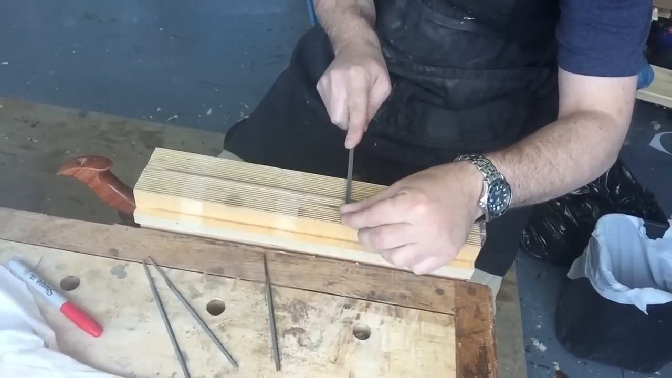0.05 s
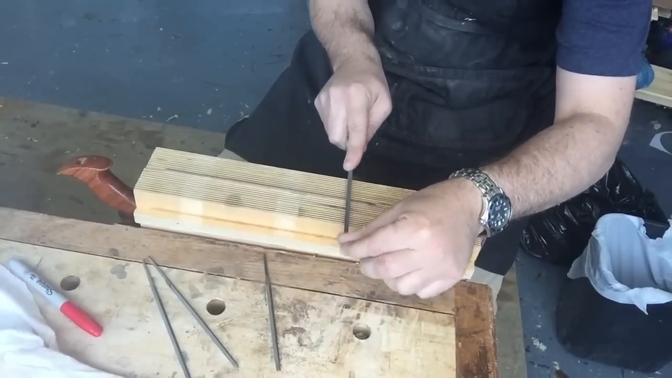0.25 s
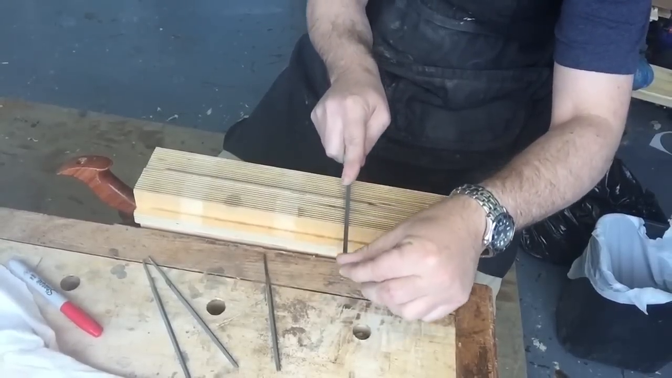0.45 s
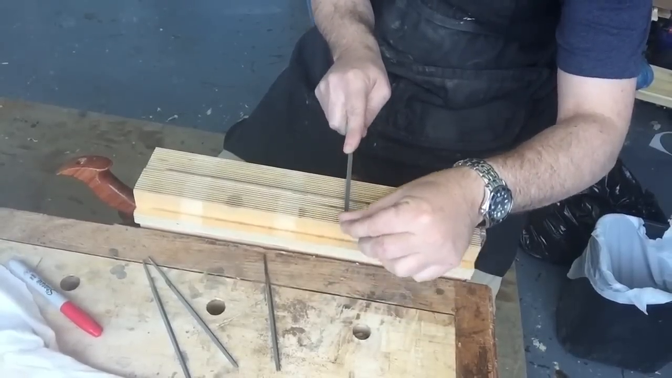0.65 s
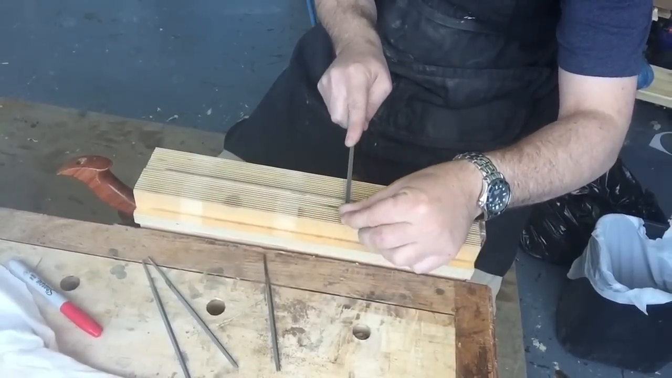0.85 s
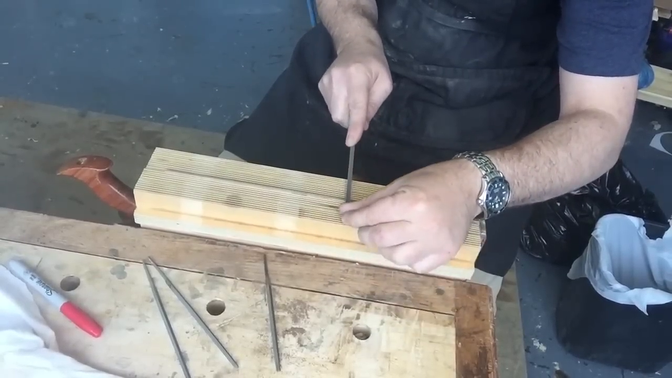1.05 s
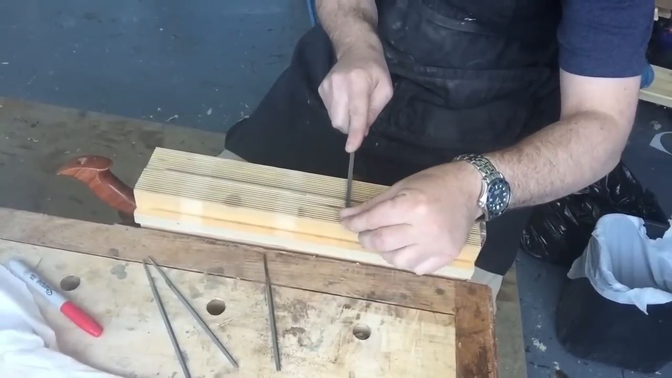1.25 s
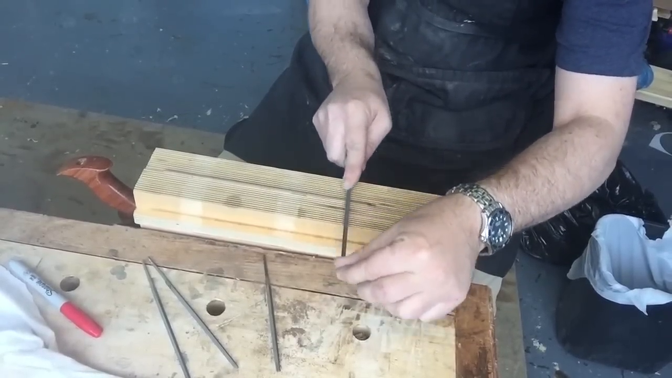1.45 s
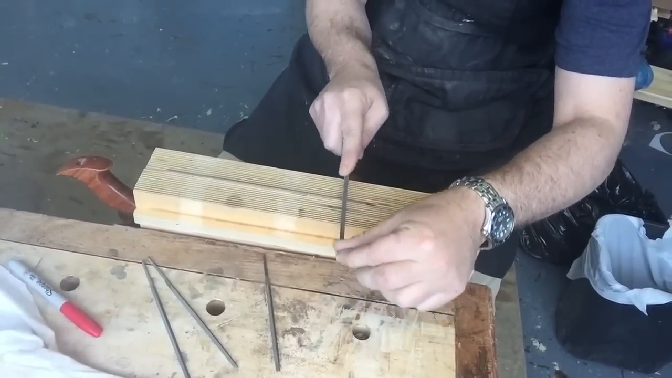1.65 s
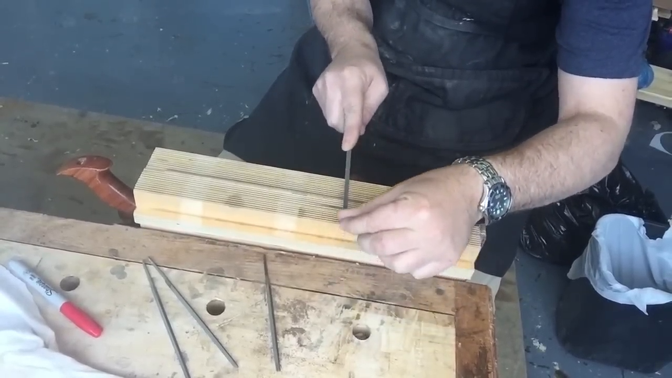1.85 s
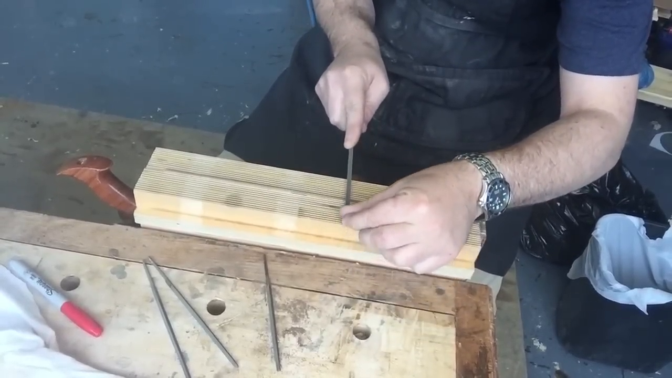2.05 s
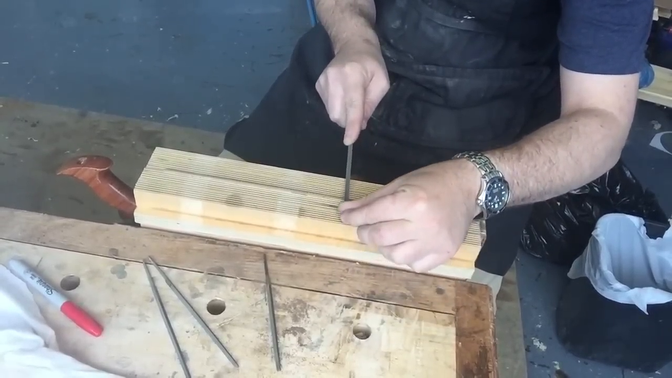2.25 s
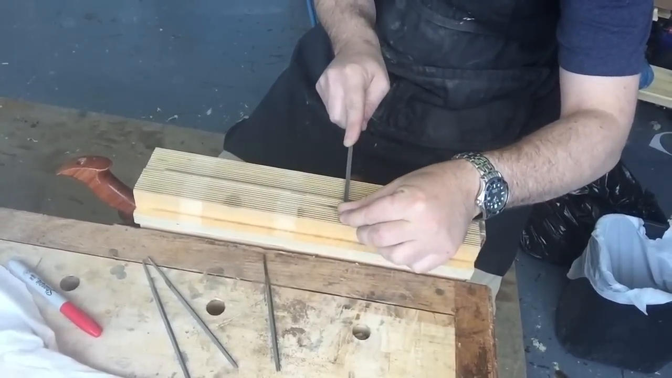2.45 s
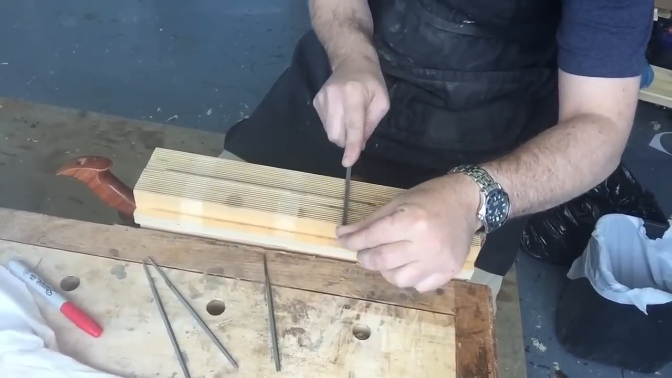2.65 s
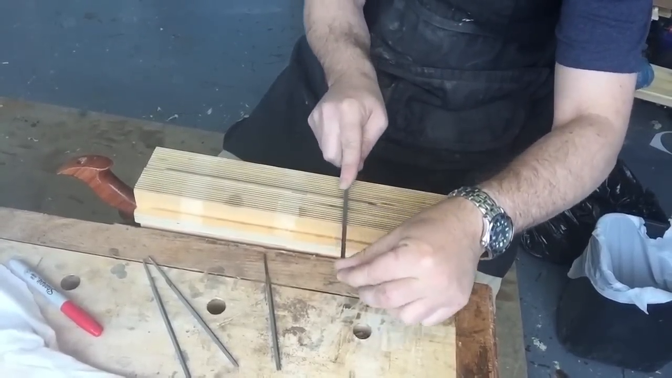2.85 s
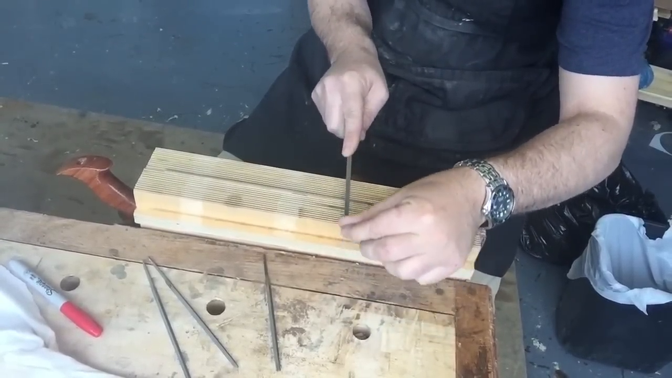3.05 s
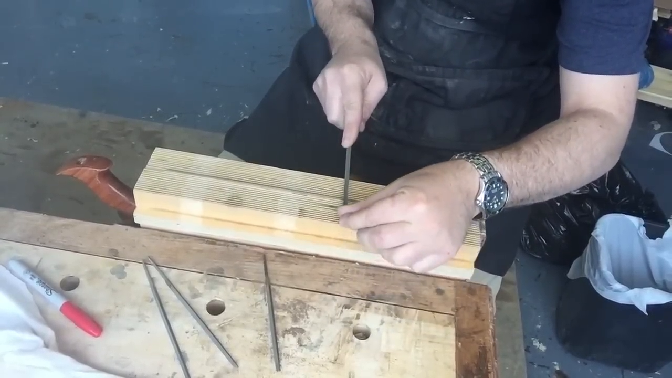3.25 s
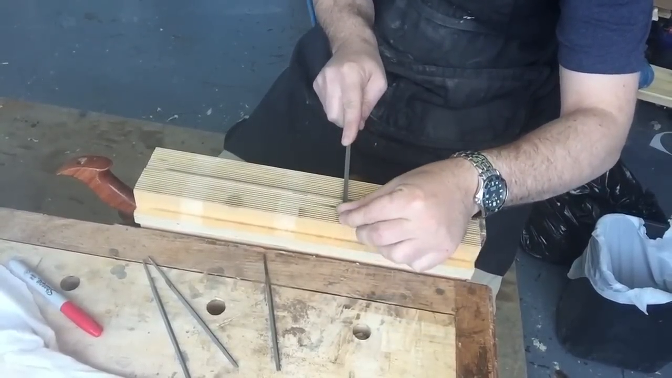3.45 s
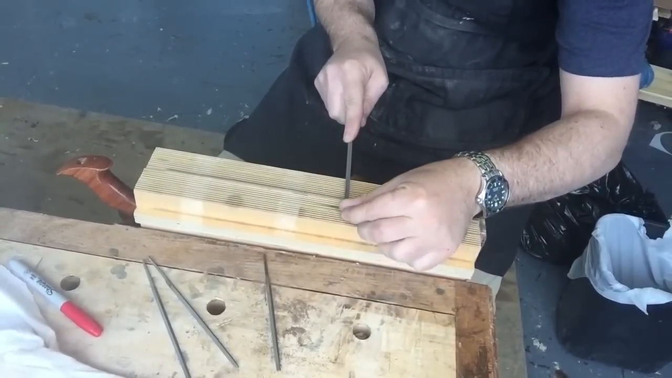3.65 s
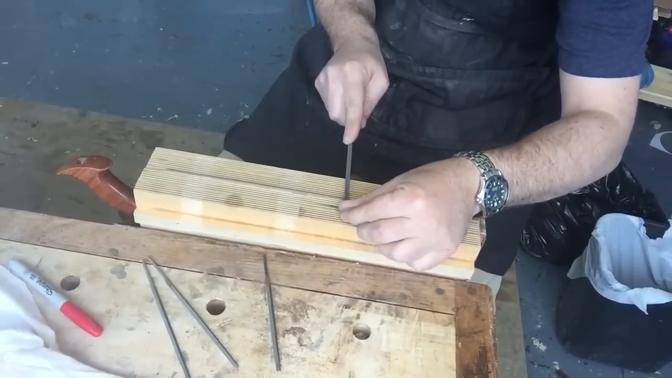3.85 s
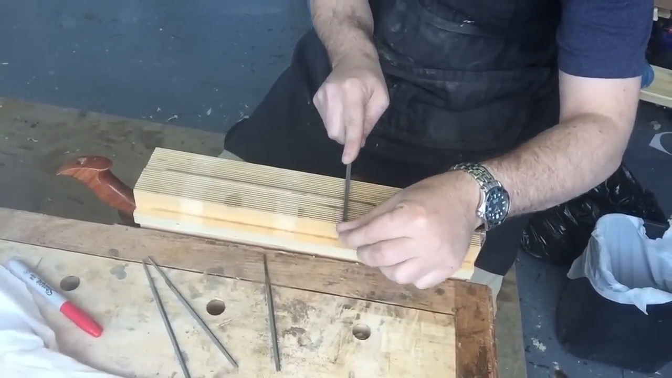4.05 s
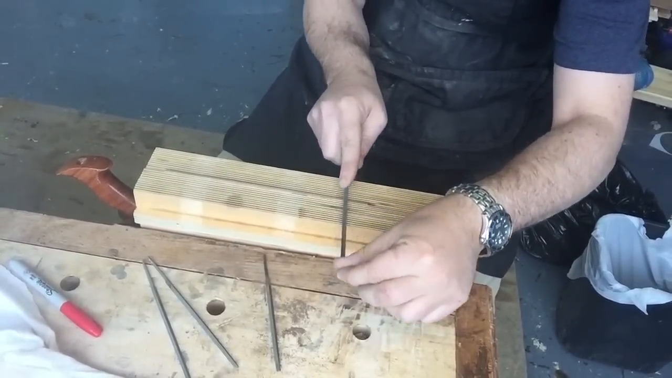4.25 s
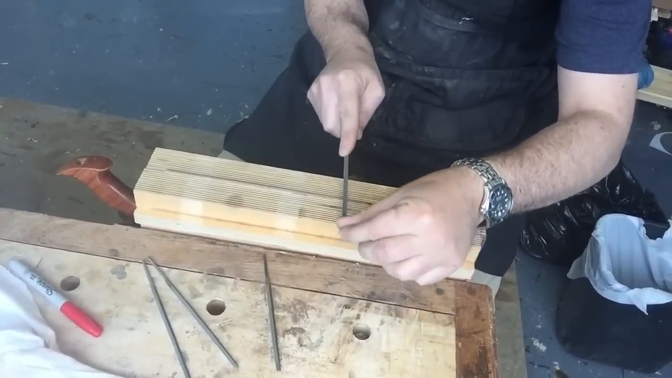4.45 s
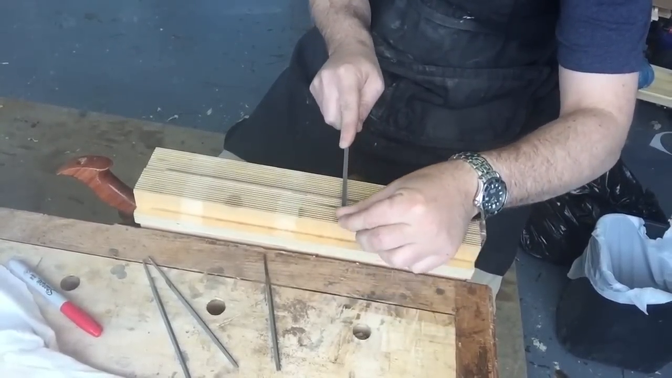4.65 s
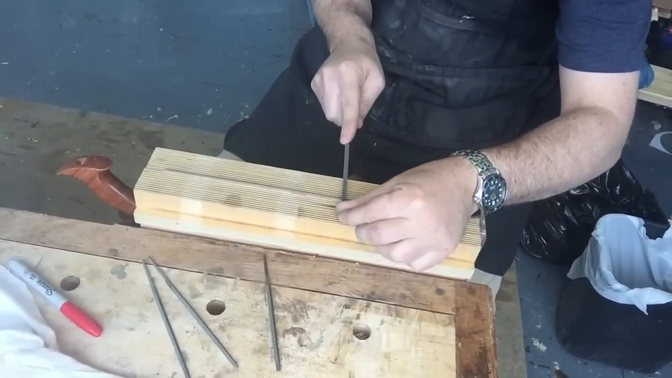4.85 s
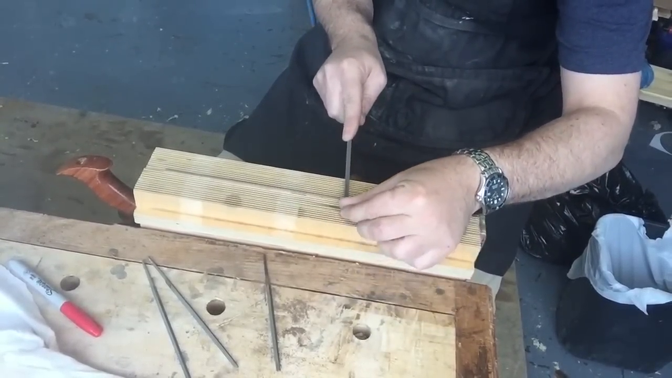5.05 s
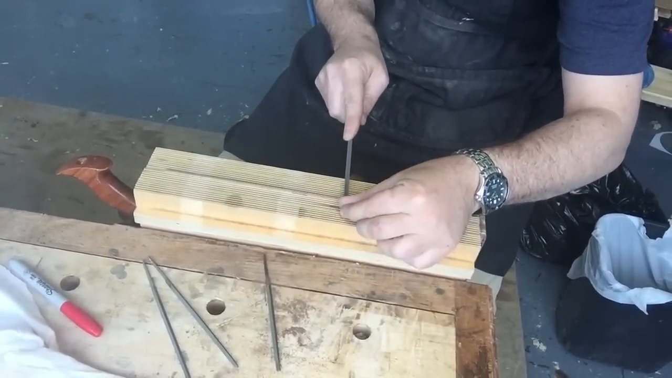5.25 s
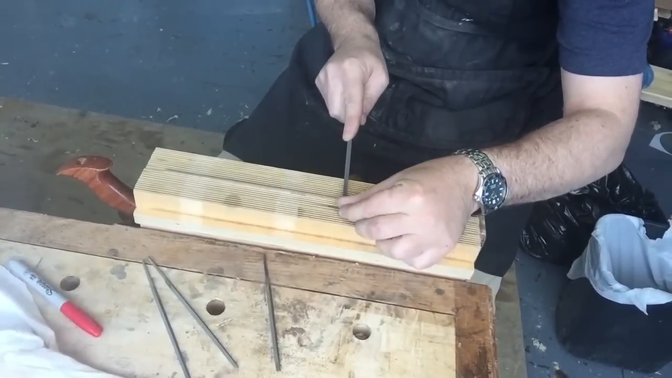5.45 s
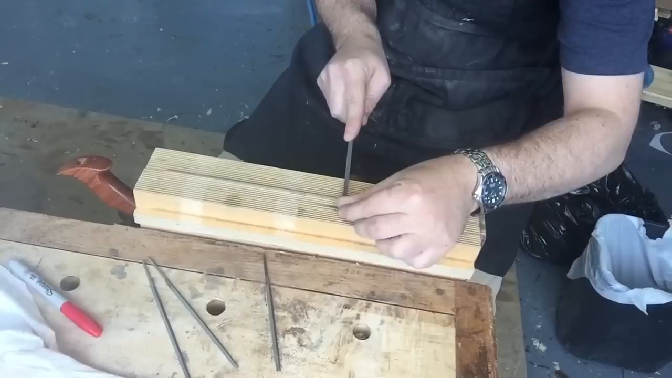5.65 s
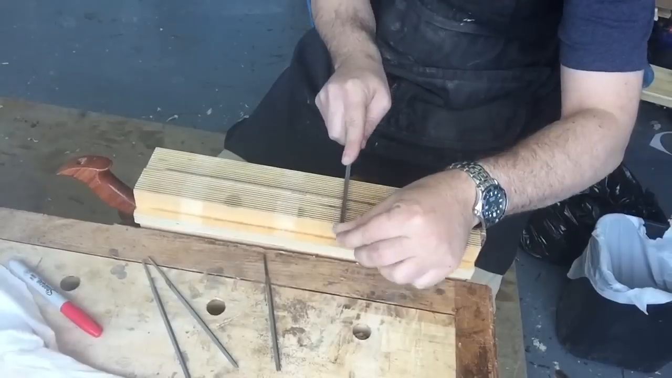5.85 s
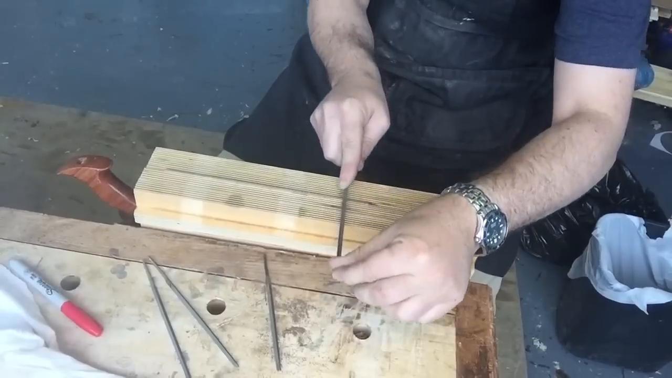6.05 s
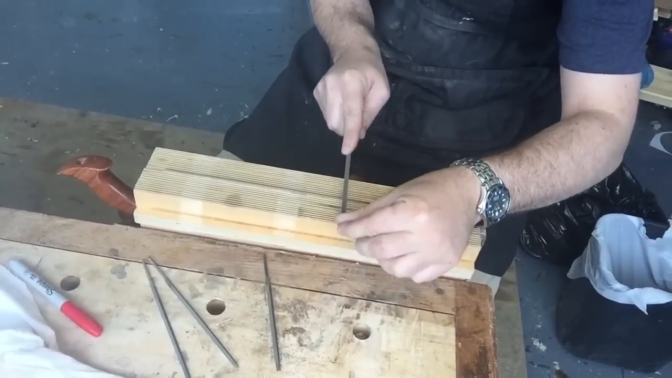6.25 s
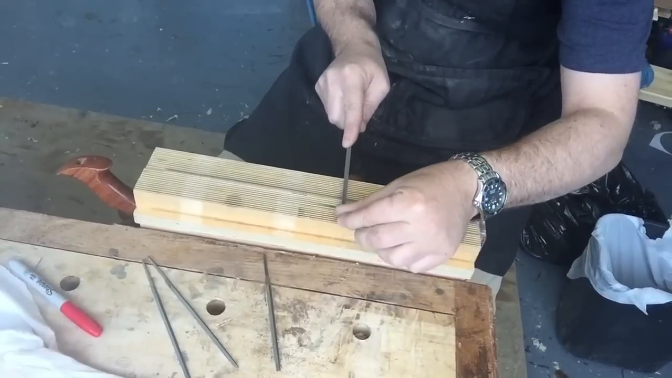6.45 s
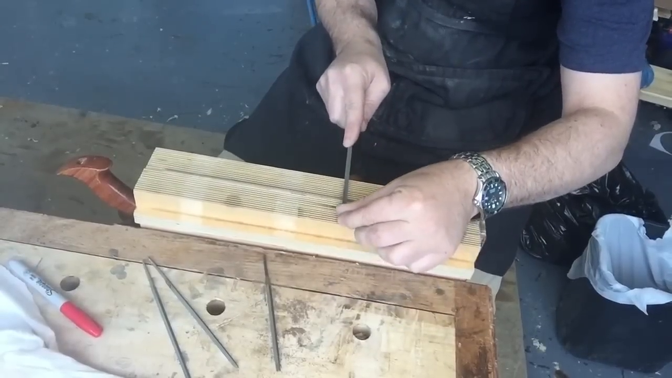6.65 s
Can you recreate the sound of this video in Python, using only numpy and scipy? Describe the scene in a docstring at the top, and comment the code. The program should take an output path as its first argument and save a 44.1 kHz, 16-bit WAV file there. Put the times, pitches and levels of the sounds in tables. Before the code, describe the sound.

Short gritty file strokes on saw steel, about one every second or so, the last after a longer pause. Each starts with a small click of landing, roars briefly around the midrange with hissing metal grit on top, then stops into a short room echo. Very soft scrapes and ticks mark the file being repositioned. Near microphone, single channel, quiet indoor air with a low wavering hum.

```python
"""A triangular file sharpens a hand saw clamped between two wooden battens, in a small workshop.
Five pushes rasp across a saw tooth: pulses, one per cut of the file, excite the modes of blade and clamp,
while chips, as noise bursts, make the steel sizzle and two gliding modes of the file squeak.
Light slides into the next gullet, landings, snags and dry ticks come between and around the pushes.
The room's decaying echo, still air, a low rumble with soft bumps and a wavering hum lie around them."""
import sys
import numpy as np
from scipy import signal
from scipy.fft import rfft, irfft, next_fast_len
from scipy.io import wavfile
from scipy.ndimage import map_coordinates

SR = 44100
rng = np.random.default_rng(int(sys.argv[2]) if len(sys.argv) > 2 else 0)


def waveform_to_disk(signal):
    """Save audio, clipped to [-1, 1], as 16-bit WAV at the path in sys.argv[1]."""
    frames = np.transpose(np.atleast_2d(signal))
    scaled = np.clip(frames, -1, 1) * 32767
    samples = np.round(scaled).astype(np.int16)
    wavfile.write(sys.argv[1], SR, samples)


N = 295911  # length in samples


def amp(db):
    """Decibel law: the amplitude factor of a level in dB."""
    return 10 ** (np.asarray(db) / 20)


def unit(x):
    """Power normalisation: x scaled to a mean square of 1."""
    return x / np.sqrt(np.mean(x ** 2) + 1e-20)


def along(points, hz):
    """Logarithmic frequency scale: (Hz, value) points interpolated in log frequency."""
    f, v = np.transpose(points)
    return np.interp(np.log(hz + 1), np.log(f), v)


def colour(points):
    """Spectral envelope: gain over frequency from (Hz, dB) points."""
    return lambda hz: amp(along(points, hz))


def resonances(modes):
    """Modal superposition: the powers of a body's modes add to its gain over frequency."""
    def gain(hz):
        power = 0
        for centre, half_width, db in modes:
            peak = amp(db) / (1 + ((hz - centre) / half_width) ** 2)
            power = power + peak ** 2
        return np.sqrt(power)
    return gain


def ring(x, gain, size=32768):
    """Minimum-phase response: x through the causal filter of unit energy with this gain over frequency."""
    magnitude = unit(gain(np.fft.rfftfreq(size, 1 / SR)))
    cepstrum = irfft(np.log(np.maximum(magnitude, 1e-6)))
    # folding the cepstrum onto positive times makes the filter causal
    cepstrum[1:size // 2] *= 2
    cepstrum[size // 2 + 1:] = 0
    response = irfft(np.exp(rfft(cepstrum)))[:size // 2]
    return signal.oaconvolve(x, response)[:N]


def wobble(rate):
    """Slow random fluctuation: a smooth curve through normal random values, rate knots a second."""
    knots = rng.standard_normal(N // 20)
    return map_coordinates(knots, [np.arange(N) * rate / SR], mode="wrap")


def stroke(start, stop, crest=.5):
    """Stroke kinematics: progress (0-1) and speed (0-1), an arch topping at the share crest of the time."""
    progress = np.clip((np.arange(N) / SR - start) / (stop - start), 0, 1)
    skew = np.log(.5) / np.log(np.clip(crest, .1, .9))
    return progress, np.abs(np.sin(np.pi * progress ** skew))


# each level grows as this power of the hand's speed
BITE_POWER, KNOCK_POWER, SIZZLE_POWER = 1.7, .65, 1.5
KNOCK_FADE_DB = 4  # the clamp is shaken this much less at the end of a push than at its start
LANDING_S = .006  # the file takes this long to seat
# a slow file skates dully instead of biting: level relative to the bite, power of the speed
SKATE_DB, SKATE_POWER = -13, 0.83
# cuts a second: nearly still, and what a push or a slide adds at its top speed
CREEP_HZ, PUSH_HZ, SLIDE_HZ = 130.23, 1152.6, 329.7
# a slide's level as a power of its speed; its sizzle relative to the blade
SLIDE_POWER, SLIDE_SIZZLE_DB = .5, -16

# Pushes of the file; crest is the share of the stroke at which speed tops, knock and sizzle are relative
# to the bite, and band is what this tooth drives hardest:
# start_s, lands_s, stop_s, crest, bite_db, knock_db, sizzle_db, band_hz, boost_db
FILE_PUSHES = [(.145, 0.212, 0.51, .6, -25.5, -7.5, -1.5, 760, 4),
               (1.291, 1.296, 1.665, .49, -25.5, -7.5, -5.5, 835, 5),
               (2.585, 2.593, 2.952, 0.54, -26.5, -6.5, -5.5, 830, 3.5),
               (3.987, 4.021, 4.348, .57, -26.8, -5, -6, 1220, 0.5),
               (5.765, 5.801, 6.1395, .55, -25, -9.5, -3.5, 860, 3.5)]
# Light slides while the file finds its place: start_s, length_s, blade_db, clamp_db
FILE_SLIDES = [(0, 0.083, -69.5, -61), (1.135, .05, -63, -70.5), (2.086, .05, -63, -62),
               (2.576, .045, -59, -59.5), (3.468, .045, -68.5, -66.5), (3.565, .09, -64, -54),
               (3.977, .05, -57, -52), (4.786, .05, -54.5, -49), (4.862, .175, -55, -53),
               (5.038, .038, -57, -62), (5.433, .06, -69, -65.5), (5.563, .04, -69, -68)]


def motion():
    """Sliding friction: the hand's speed sets the forces, the sizzle and the rate of cuts crossing the tooth."""
    t = np.arange(N) / SR
    bite, touch, knock, sizzle = np.zeros((4, N))
    rate = np.full(N, float(CREEP_HZ))
    for start, lands, stop, crest, bite_db, knock_db, sizzle_db, *_ in FILE_PUSHES:
        progress, speed = stroke(start, stop, crest)
        press = amp(bite_db) * np.clip((t - lands) / LANDING_S, 0, 1)
        bite += press * speed ** BITE_POWER
        touch += press * speed ** SKATE_POWER * amp(SKATE_DB)
        knock += press * speed ** KNOCK_POWER * amp(knock_db - KNOCK_FADE_DB * (progress - .5))
        sizzle += press * speed ** SIZZLE_POWER * amp(sizzle_db)
        rate += PUSH_HZ * speed
    for start, length, blade_db, clamp_db in FILE_SLIDES:
        _, speed = stroke(start, start + length)
        rub = speed ** SLIDE_POWER
        touch += rub * amp(blade_db)
        knock += rub * amp(clamp_db)
        sizzle += rub * amp(blade_db + SLIDE_SIZZLE_DB)
        rate += SLIDE_HZ * speed
    return bite, touch, knock, sizzle, rate


def cuts(rate, jitter, scatter_db):
    """Impulsive excitation: one pulse of uneven timing and size for each cut of the file; mean power 1."""
    count = np.cumsum(rate) / SR
    chance = rng.standard_normal((N // 20, 2))[:int(count[-1])]
    turn = np.arange(len(chance)) + jitter * chance[:, 0]
    at = np.minimum(np.searchsorted(count, turn), N - 1)
    size = unit(amp(scatter_db * np.clip(chance[:, 1], -2, 2)))
    # sparser pulses are larger, so that the rate leaves the power unchanged
    return np.bincount(at, size * np.sqrt(SR / rate[at]), N)


def crumble(pulses, life):
    """Fracture noise: each pulse tears off a chip, a burst with its energy and a power decay of life s."""
    keep = np.exp(-1 / (life * SR))
    power = signal.lfilter([1 - keep], [1, -keep], pulses ** 2)
    return np.sqrt(np.abs(power)) * rng.standard_normal(N)


def favour(force, sharpness=4):
    """Selective excitation: each push works another tooth, which lifts its own band of the blade's modes."""
    out = force.copy()
    for _, lands, stop, *_, hz, boost_db in FILE_PUSHES:
        span = slice(int(lands * SR), int(stop * SR))
        band = signal.lfilter(*signal.iirpeak(hz, sharpness, SR), force[span])
        out[span] += (amp(boost_db) - 1) * band
    return out


# Modes of the saw blade: centre_hz, half_width_hz, level_db
BLADE_MODES = [(789, 99, -8.5), (868, 6.8, -8.5), (913.7, 38, -1.5), (969.4, 16, -2), (1056.4, 34.3, 0),
               (1154, 24, -3.5), (1183, 21, -5), (1241, 50, -5), (1347, 42.8, -7.5), (1508, 139.8, -8.5),
               (1902, 137, -7.5), (2089, 31.4, -11), (2340, 180, -10), (2595, 81, -13), (2910, 129, -5),
               (2946, 270, -20.5), (3748, 104, -17.5), (4155, 260, -22), (4680, 268.5, -22.5),
               (5560, 510, -23), (6080, 290, -23.5), (6980, 740, -21), (8980, 440, -24.5), (9680, 226, -22),
               (10130, 160, -23), (11450, 580, -23.5)]
# Modes of the wooden clamp: centre_hz, half_width_hz, level_db
CLAMP_MODES = [(160, 22, -10), (210, 18, -12), (258.9, 13, 1), (300.4, 14.45, -9), (336.8, 33, -10),
               (448.4, 19, -5.5), (440.8, 28, -2.5), (562.5, 27, -9.5), (643.6, 35, -17)]
# High ring of the steel, relative levels: frequency_hz, level_db
STEEL_RING = [(7000, -54), (9500, -14), (10600, -29), (12000, -22), (12600, -2.5), (13000, -2),
              (13500, 1.5), (14300, -3.5), (15300, -12.5)]
# How a light touch dulls the rasp, relative levels: frequency_hz, level_db
LIGHT_TOUCH = [(700, 7), (1300, 1.5), (2300, 1.5), (2950, -6), (4500, 0), (7000, -11.5), (11000, -9)]


def rasp(bite, touch, knock, sizzle, rate):
    """Forced vibration: cuts knock the saw and tear chips; the grip tightens and slackens unevenly."""
    teeth = cuts(rate, jitter=.14, scatter_db=3.5)
    grip = wobble(130)
    force = amp(-4.0) * teeth + amp(-2.0) * crumble(teeth, life=0.0014)
    force = force * unit(amp(1.24 * grip))
    pressed = favour(force * bite)
    skating = ring(force * touch, colour(LIGHT_TOUCH))
    blade = ring(pressed + skating, resonances(BLADE_MODES))
    clamp = ring(force * knock, resonances(CLAMP_MODES))
    chips = crumble(teeth * unit(amp(2.255 * wobble(700))), life=0.00039)
    steel = ring(chips * sizzle * unit(amp(2.4 * grip)), colour(STEEL_RING))
    return amp(-2.06) * blade + amp(1.26) * clamp + steel


BUMP_S = 0.027  # a bump swells from 1/e of its peak, and fades back to it, in this time
# Spectrum of the still air, relative levels: frequency_hz, level_db
AIR_SPECTRUM = [(15, -43), (28, -29.5), (60, -6), (120, -7.5), (170, -6.5), (245, -3), (290, -10),
                (450, -17.5), (950, -18), (2230, -30), (5880, -35), (15500, -44)]
# Soft low bumps around the bench: centre_s, level_db
BENCH_BUMPS = [(2.093, -60), (3.06, -58.5), (3.37, -55.5), (3.631, -56), (4.9, -56), (5.53, -56),
               (5.78, -52), (6.258, -56)]


def background():
    """Filtered noise and phase modulation: still air, restless low rumble, soft bumps and a wavering hum."""
    t = np.arange(N) / SR
    air = amp(-62.5 + 0.86 * wobble(8.4)) * ring(rng.standard_normal(N), colour(AIR_SPECTRUM))
    swell = amp(-64.5 + 2.38 * wobble(15))
    for s, db in BENCH_BUMPS:
        swell = swell + amp(db) * np.exp(-((t - s) / BUMP_S) ** 2)
    low = colour([(30, -29.5), (62, 7), (95, -0.5), (180, -5.0), (400, -33.5), (1500, -85.0)])
    rumble = swell * ring(rng.standard_normal(N), low)
    hum = amp(-69 + 5.59 * wobble(5.8)) * np.sin(2 * np.pi * 215 * t + 2.7 * wobble(14))
    return air + rumble + hum


# Reverberation of the room, time to decay by 60 dB: frequency_hz, decay_s
ROOM_DECAY = [(200, 0.47), (500, 0.42), (1000, 0.41), (2000, 0.4), (2900, 0.39), (4200, .41), (8000, 0.27),
              (14000, .24)]
# Strength of the room's answer, relative levels: frequency_hz, level_db
ROOM_ANSWER = [(200, -0.5), (500, -3.5), (1050, -3.5), (2200, -4), (2900, -3), (3300, 2), (4200, 3),
               (9000, -3.5), (13500, -8.5)]


def workshop(x, delay=.005, count=24, boom_hz=211, boom_sharpness=70, boom_db=11):
    """Reverberation: count noise tails in turn, each a new random draw; treble dies first, a low mode last."""
    noise = rng.standard_normal((count, SR * 2 // 3))
    hz, t, z = signal.stft(noise, SR, nperseg=256)
    decay = amp(-60 * t / along(ROOM_DECAY, hz)[:, None])
    tails = signal.istft(z * decay, SR, nperseg=256)[1]
    wet = np.zeros(N + SR)
    # renewing the tail averages out the chance peaks of any one draw
    for part, tail in zip(np.array_split(np.arange(N), count), tails):
        answer = signal.fftconvolve(x[part], tail / np.linalg.norm(tail))
        wet[part[0] + int(delay * SR):][:len(answer)] += answer
    boom = signal.lfilter(*signal.iirpeak(boom_hz, boom_sharpness, SR), x)
    return ring(wet[:N], colour(ROOM_ANSWER)) + amp(boom_db) * boom


def blows(times, db):
    """Ideal impulses: single samples at these times (s) and levels (dB)."""
    return np.bincount(np.round(times * SR).astype(int), amp(db), N)


# The file lands on or snags a tooth, sizzle relative to the blow: start_s, blow_db, sizzle_db
TOOTH_CATCHES = [(0.205, -20, -4), (0.217, -10, -20), (1.162, -35.5, -6), (1.2, -29.5, -2), (1.303, -35, 6),
                 (1.36, -7.5, -1), (2.095, -34.5, -14.5), (2.62, -23.5, -9), (2.841, -8, -1),
                 (3.489, -45, -20.5), (3.997, -32, -8.5), (4.025, -19, -4.5), (4.085, -5, -5),
                 (4.799, -33.5, -15), (5.202, -39.5, -26.5), (5.469, -38, -29.5), (5.784, -24.5, -11),
                 (5.809, -14, -9.5)]
# Small dry ticks from handling: start_s, blow_db
HANDLING_TICKS = [(0.165, -40.5), (2.401, -20), (3.804, -26), (5.334, -35.5)]
# Spectrum of a tick, relative levels: frequency_hz, level_db
TICK_SPECTRUM = [(200, -13.5), (650, -9), (950, 7.5), (1300, 0), (1900, -6.5), (2450, 1.5), (3300, -19.5),
                 (4800, -13), (7500, -19.5), (9500, -48.5)]


def knocks():
    """Impulse response: landings and snags ring the saw; handling adds a few dry ticks."""
    s, db, sizzle_db = np.transpose(TOOTH_CATCHES)
    hits = blows(s, db)
    force = hits + amp(-1.5) * crumble(hits, life=.002)
    saw = ring(force, resonances(BLADE_MODES)) + amp(-2.5) * ring(force, resonances(CLAMP_MODES))
    steel = ring(crumble(blows(s, db + sizzle_db), life=.0008), colour(STEEL_RING))
    tick_bursts = crumble(blows(*np.transpose(HANDLING_TICKS)), life=0.0041)
    return saw + steel + ring(tick_bursts, colour(TICK_SPECTRUM))


# The file chatters; swell is the time to swell and to fade, pitch that at the centre:
# centre_s, swell_s, pitch_hz, level_db
FILE_SQUEAKS = [(0.328, .028, 12850, -14.5), (0.367, .018, 14500, -15), (.389, 0.026, 13370, -11.5),
                (.448, .024, 13700, -18.5), (1.43, .018, 13110, -18), (1.567, 0.033, 13870, -17.5),
                (2.804, 0.0081, 14000, -30), (2.872, 0.028, 13910, -20), (3.998, 0.0042, 10900, -42),
                (4.138, 0.033, 13500, -22.5), (4.22, 0.0099, 13900, -27.5), (5.863, 0.01, 13640, -26.5),
                (5.95, .022, 13200, -16), (6.01, .016, 13570, -11), (6.066, 0.015, 14120, -16.5)]


def squeaks(rate, glide_hz=-32000, limit=1.24, lower_ratio=0.63, lower_db=-24):
    """Friction-limited oscillation: cuts pump two file modes, falling in Hz a second as the contact moves."""
    t = np.arange(N) / SR
    life = .0007  # s, amplitude decay of one kick
    kicks = cuts(rate, jitter=.1, scatter_db=7.0) * np.exp(2j * np.pi * rng.random(N))
    swing = signal.lfilter([1], [1, -np.exp(-1 / (life * SR))], kicks)
    swing /= np.std(swing)
    swing /= np.hypot(1, np.abs(swing) / limit)  # friction limits the swing
    out = np.zeros(N)
    for s, length, hz, db in FILE_SQUEAKS:
        near = np.abs(t - s) < 2 * length
        u = t[near] - s
        phase = 2 * np.pi * (hz * u + glide_hz * u ** 2 / 2)
        modes = np.exp(1j * phase) + amp(lower_db) * np.exp(1j * lower_ratio * phase)
        envelope = amp(db) * np.exp(-2 * (u / length) ** 2)
        out[near] += envelope * (swing[near] * modes).real
    return out


def scene():
    """Linear superposition: filing, its echo and the quiet of the shop add in one channel."""
    bite, touch, knock, sizzle, rate = motion()
    bench = rasp(bite, touch, knock, sizzle, rate) + squeaks(rate) + knocks()
    return (bench + amp(-9.5) * workshop(bench) + background())[None]


TOP_HZ = 15450  # nothing remains from here up


def record(dry):
    """Band limiting: the gain falls in a straight line to zero over the last 150 Hz below TOP_HZ."""
    size = next_fast_len(N + SR // 2)  # the padding keeps the end from wrapping onto the start
    hz = np.fft.rfftfreq(size, 1 / SR)
    gain = np.clip((TOP_HZ - hz) / 150, 0, 1)
    return irfft(rfft(dry, size) * gain, size)[..., :N]


dry = scene()
out = record(dry)
waveform_to_disk(out)
```